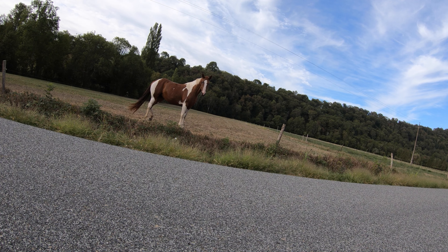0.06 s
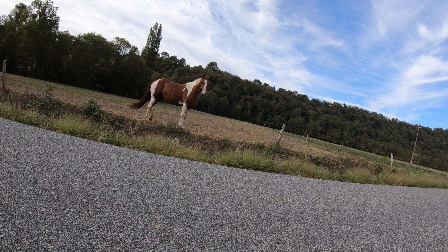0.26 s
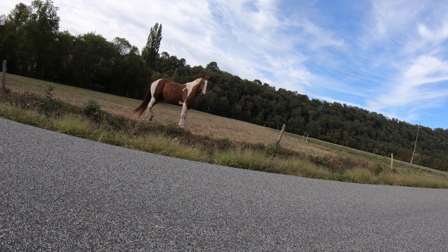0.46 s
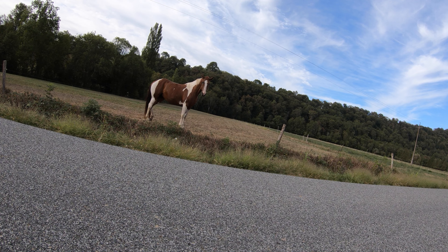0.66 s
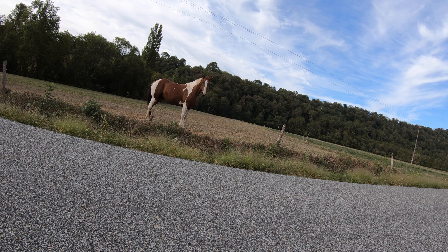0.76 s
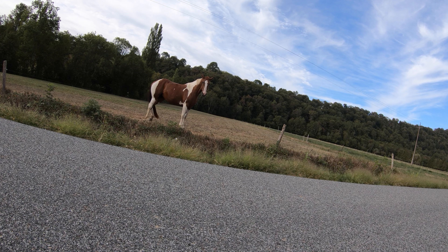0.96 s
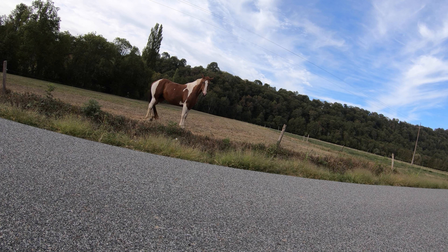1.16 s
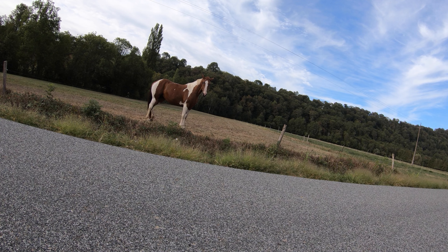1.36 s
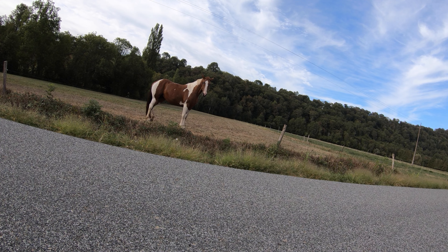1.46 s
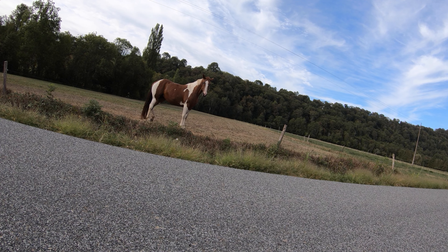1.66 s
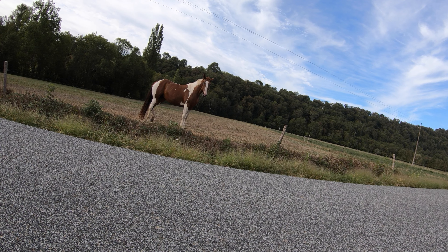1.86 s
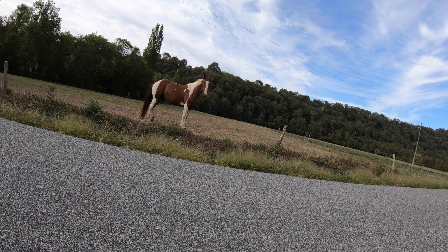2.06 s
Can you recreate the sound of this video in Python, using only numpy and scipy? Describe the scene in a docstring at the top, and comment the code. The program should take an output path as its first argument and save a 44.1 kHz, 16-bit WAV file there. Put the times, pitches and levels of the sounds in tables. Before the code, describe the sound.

A horse nickers softly, mostly on the right, over a faint outdoor hush. A throaty grunt at 0.3 s, with two tiny bird squeaks, then a hard double clack near 0.55 s with a faint bounce. Low fluttering grunts run 0.63-1.0 s. Dry grass rustles and stems crack around 1.2-1.4 s amid brighter grunts, which dull and fade by 1.75 s; a weak breathy murmur remains to about 2.1 s.

```python
"""A faint outdoor hush, then a horse nickers softly by a quiet country road, mostly on the right.
Grunts: slow breathy pulses ring airway resonances, bright at the start, dull at the end; a hoarse murmur
of weak pulses and breath links them. Dry grass hisses and rustles in a breeze (shaped noise) and its stalks
snap (noise bursts). Stems crack (decaying sines), something clacks twice with a faint bounce (sines and
noise), and a small bird squeaks twice (bent tones)."""
import sys
import numpy as np
from scipy import signal
from scipy.fft import rfft, irfft, next_fast_len
from scipy.io import wavfile
from scipy.ndimage import map_coordinates

SR = 44100
rng = np.random.default_rng(int(sys.argv[2]) if len(sys.argv) > 2 else 0)


def inscribe(sig):
    """Save sig as 16-bit PCM at rate SR to the path in sys.argv[1].

    A 1-D sig is mono; a 2-D sig holds one channel per row.
    Samples are clipped to [-1, 1] before scaling.
    """
    pcm = np.round(np.clip(np.atleast_2d(sig).T, -1, 1) * 32767)
    wavfile.write(sys.argv[1], SR, pcm.astype(np.int16))


N = 93580


def amp(db):
    """Decibels to gain."""
    return 10 ** (np.asarray(db) / 20)


def unit(x):
    """Scale to rms 1 over all channels."""
    return x / np.sqrt(np.mean(x ** 2) + 1e-20)


def along(points, hz):
    """Interpolate (f/Hz, value) points on a log frequency axis."""
    f, v = np.transpose(points)
    return np.interp(np.log(hz + 1), np.log(f + 1), v)


def clock():
    """Time of each sample, s."""
    return np.arange(N) / SR


def level(rows):
    """Gain per sample from (t/s, level/dB) rows."""
    return amp(np.interp(clock(), *np.transpose(rows)))


def wobble(knots_per_s):
    """Smooth random curve through normal-distributed knots."""
    knots = rng.standard_normal(int(N * knots_per_s / SR) + 4)
    return map_coordinates(knots, [clock() * knots_per_s])


def filtered(x, response):
    """Filter x by a complex response of frequency, zero-padded."""
    m = next_fast_len(N + SR // 2)
    return irfft(rfft(x, m) * response(np.fft.rfftfreq(m, 1 / SR)), m)[..., :N]


def noise(spectrum, channels=2):
    """Unrelated noises coloured by (f/Hz, level/dB) points, rms 1."""
    white = rng.standard_normal((channels, N))
    return unit(filtered(white, lambda f: amp(along(spectrum, f))))


def pan(db):
    """Left and right gains; positive db favours the left."""
    return amp(np.array([[db], [-db]]) / 2)


def echo(x, db, t60_s):
    """Weak scattered answer from the surroundings: convolution with decaying noise."""
    t = np.arange(SR // 2) / SR
    tail = rng.standard_normal((2, len(t))) * amp(-60 * t / t60_s)
    tail = tail / np.linalg.norm(tail[0])
    return amp(db) * signal.fftconvolve(x, tail, axes=1)[:, :N]


# left against right: (f/Hz, level/dB)
LEFT_LEVEL = [(60, -30), (115, -13), (190, -17), (380, -8.5), (700, -2), (1200, -1)]
# left phase lead: (f/Hz, phase/rad)
LEFT_PHASE = [(30, 0), (120, 1.3), (190, 1.8), (340, 3.1), (700, 3), (1200, 2.6), (2400, 1.7), (4000, .4)]


def from_right(x):
    """A source at the right: the left side gets a weaker, phase-shifted copy."""
    def left_response(f):
        return amp(along(LEFT_LEVEL, f)) * np.exp(1j * along(LEFT_PHASE, f))
    return np.array([filtered(x, left_response), x])


# hush colour: (f/Hz, relative density/dB per Hz)
HUSH_SPECTRUM = [(14, -11.5), (30, 7), (44, -9), (58, 1.5), (100, -21.5), (170, 1), (450, -24),
                 (800, -11.5), (1400, -20), (2500, -36), (5000, -34), (7500, -38), (11000, -43),
                 (15400, -47)]
# left-right likeness: (f/Hz, correlation)
HUSH_LIKENESS = [(30, 0.83), (150, -0.17), (400, -0.21), (1000, -0.98), (3000, 0.58), (10000, -0.069)]
HUSH_DB = -59


def hush():
    """Faint, wide valley background: mid and side noise mixed to a set likeness per frequency."""
    def mid_side_gains(f):
        angle = np.arccos(np.clip(along(HUSH_LIKENESS, f), -1, 1)) / 2
        return np.array([np.cos(angle), np.sin(angle)])
    mid, side = filtered(noise(HUSH_SPECTRUM), mid_side_gains)
    return amp(HUSH_DB) * unit(np.array([mid + side, mid - side])) * pan(0.45)


# stalks snapping: (t/s, level/dB, centre f/Hz, e-fold decay/s)
STALK_SNAPS = [(.413, -63, 6150, 0.0012), (0.643, -62.5, 7300, 0.0017), (0.786, -62, 7800, 0.0014),
               (.824, -54, 3000, 0.00084), (1.18, -51, 785, 0.0042), (1.231, -57, 2230, 0.012),
               (1.289, -55.5, 1980, 0.013), (1.346, -62, 1890, 0.008), (1.365, -61, 5670, 0.021),
               (1.375, -60, 7850, 0.0073)]
SNAP_OCTAVES = .55  # half-width of the snap band


def snaps():
    """Single stalks snap: decaying noise bursts, each in its own band."""
    t, out = clock(), np.zeros(N)
    for s, db, hz, decay_s in STALK_SNAPS:
        burst = rng.standard_normal(N) * (t >= s) * np.exp(-abs(t - s) / decay_s)
        burst *= np.sqrt(SR / (2 * hz * SNAP_OCTAVES))  # offset the band's power loss
        out += amp(db) * filtered(burst, lambda f: 1 / (1 + (np.log2((f + 1) / hz) / SNAP_OCTAVES) ** 4))
    return out


# hiss before HISS_GAIN_DB: (t/s, level/dB)
HISS_LEVEL = [(0.0, -81), (0.26, -78.5), (0.37, -71.5), (0.57, -71.5), (1.1, -65.5), (1.17, -61),
              (1.34, -63), (1.37, -54.5), (1.43, -66.5), (2.12, -75.5)]
# hiss colour: (f/Hz, relative density/dB per Hz)
HISS_SPECTRUM = [(1500, -37), (2500, -2), (4700, -7.5), (6400, -2), (7600, -1), (8800, -8.5), (12200, -17),
                 (14000, -18), (15500, -22)]
# coarser rustle: (t/s, level/dB)
RUSTLE_LEVEL = [(0, -104), (.22, -79.5), (.31, -67), (.4, -75), (.53, -83), (.57, -66.5), (.7, -71.5),
                (1.0, -72), (1.04, -61.5), (1.1, -72.5), (1.17, -62.5), (1.2, -62.5), (1.24, -54.5),
                (1.32, -65), (1.36, -54.5), (1.44, -67.5), (2.12, -74)]
# rustle colour: (f/Hz, relative density/dB per Hz)
RUSTLE_SPECTRUM = [(300, -27), (800, -1.5), (1400, 0), (2100, 2), (3200, -11.5), (5000, -29), (9000, -32.5)]
# extra tilt of all grass sound, left against right: (f/Hz, level/dB)
GRASS_TILT = [(800, -11.5), (2000, -0.5), (5000, -7), (8000, -7.5), (12000, 0)]
HISS_GAIN_DB, GRAIN_DB, GRAIN_KNOTS_PER_S = -2, 1, 370


def grass():
    """A grainy hiss and a coarser rustle swell with the breeze; single stalks snap."""
    hiss = amp(HISS_GAIN_DB) * level(HISS_LEVEL) * noise(HISS_SPECTRUM)
    rustle = level(RUSTLE_LEVEL) * from_right(noise(RUSTLE_SPECTRUM, channels=1)[0])
    grain = unit(amp(GRAIN_DB * wobble(GRAIN_KNOTS_PER_S)))
    out = (hiss + rustle) * grain + from_right(snaps())
    return filtered(out, lambda f: amp(np.outer([.5, -.5], along(GRASS_TILT, f))))


# stem cracks: (t/s, low ring level/dB, high ring level/dB)
STEM_CRACKS = [(1.181, -51, -40), (1.3415, -32, -56)]
# low and high ring: f/Hz; t60/s
STEM_RING_HZ = (900, 2030)
STEM_RING_T60_S = (.022, .018)


def stems():
    """Thicker dry stems crack with a brief two-note ring: decaying sines."""
    out = np.zeros(N)
    for s, *levels in STEM_CRACKS:
        age = np.maximum(clock() - s, 0)
        for db, hz, t60_s in zip(levels, STEM_RING_HZ, STEM_RING_T60_S):
            out += amp(db - 60 * age / t60_s) * np.sin(2 * np.pi * hz * age)
    return out


# knocks: (t/s, ring level/dB, crack level/dB)
KNOCKS = [(0.5453, -53.5, -45), (0.5555, -46.5, -62), (0.5929, -63, -51.5)]
# ring modes: (f/Hz, level on top of the ring/dB, t60/s)
KNOCK_MODES = [(1087, 6.5, 0.023), (1192, 3, 0.02), (1997, -6.5, 0.037), (2160, -9.5, .02)]
# crack colour: (f/Hz, relative density/dB per Hz)
CRACK_SPECTRUM = [(600, 8), (2100, 1.5), (2900, -19), (5000, -13), (6500, 2.5), (8000, -25), (14000, -42)]
RING_ATTACK_S, RING_TOP_HZ, CRACK_T60_S = 0.0007, 2400, 0.014
RING_TAIL_DB, RING_TAIL_T60_S = -8, 0.18


def clacks():
    """Hard double knock and faint bounce: a crack and a short hollow ring, scattered by the trees."""
    t, ring, crack = clock(), np.zeros(N), np.zeros(N)
    for s, ring_db, crack_db in KNOCKS:
        age = np.maximum(t - s, 0)
        attack = 1 - np.exp(-age / RING_ATTACK_S)
        for hz, db, t60_s in KNOCK_MODES:
            ring += attack * amp(ring_db + db - 60 * age / t60_s) * np.sin(2 * np.pi * hz * age)
        crack += (t >= s) * amp(crack_db - 60 * age / CRACK_T60_S)
    ring = filtered(ring, lambda f: 1 / np.sqrt(1 + (f / RING_TOP_HZ) ** 20)) * pan(4.1)
    return ring + echo(ring, RING_TAIL_DB, RING_TAIL_T60_S) + crack * noise(CRACK_SPECTRUM)


# bird: (t/s, level/dB)
BIRD_SQUEAKS = [(0.337, -68.5), (.362, -63.5)]
SQUEAK_HZ, SQUEAK_S, SQUEAK_BEND_HZ = 7700, 0.0067, 283  # lowest pitch, 1/e half-length, rise there


def bird():
    """Two thin squeaks: bell-shaped tones, each dipping and rising in pitch."""
    out = np.zeros(N)
    for s, db in BIRD_SQUEAKS:
        u = np.clip((clock() - s) / SQUEAK_S, -4, 4)
        cycles = np.cumsum(SQUEAK_HZ + SQUEAK_BEND_HZ * u * u) / SR
        out += amp(db) * np.exp(-u * u) * np.sin(2 * np.pi * cycles)
    return out


MUFFLE = 1.067  # soft-tissue cutoff as a multiple of the resonance frequency


def resonance(f, hz, width_hz):
    """Airway resonance with steep skirts; soft tissue muffles it above its centre."""
    def band(w):
        return 1j * f * w / (hz * hz - f * f + 1j * f * w)
    return band(width_hz) * band(6 * width_hz) / np.sqrt(1 + (f / (MUFFLE * hz)) ** 20)


# low hum, then throaty hum, before MURMUR_GAIN_DB: (t/s, level/dB)
HUM_LEVEL = [(0, -69.5), (0.041, -53.5), (.1, -72), (.29, -76), (0.379, -39), (.42, -51), (.5, -48),
             (.6, -45.5), (0.799, -54.5), (1.029, -45), (1.11, -56), (1.17, -53.5), (1.42, -53.5),
             (1.66, -59.5), (1.75, -58), (1.85, -50), (2.12, -57.5)]
THROAT_HUM_LEVEL = [(0, -57), (.06, -60.5), (0.149, -78), (.29, -79), (.38, -50.5), (.45, -56), (.52, -47),
                    (.6, -52.5), (.8, -59), (.97, -47.5), (1.05, -50), (1.11, -69), (1.42, -58),
                    (1.66, -60.5), (1.745, -61), (1.78, -58.5), (1.92, -51), (2.039, -49.5), (2.12, -80)]
# their resonances: (f/Hz, width/Hz, relative level/dB)
HUM_MODES = [(156.9, 4.7, 12.5), (200, 67, 2.5), (672, 22, -14), (835, 120, -21.5), (1250, 1300, -30.5)]
THROAT_HUM_MODES = [(324, 36, -4.5), (394, 29, 0)]
MURMUR_GAIN_DB, MURMUR_RATE_HZ = 2.5, 65.7
MURMUR_WANDER, MURMUR_BREATH = .05, 2.4  # rate drift (share), breath rms against pulse rms
FLUTTER_KNOTS_PER_S, FLUTTER_DB = 45.31, 2


def murmur():
    """Weak pulses and fluttering breath keep the airway humming between the grunts."""
    rate_hz = MURMUR_RATE_HZ * (1 + MURMUR_WANDER * wobble(20))
    cycles = np.floor(np.cumsum(rate_hz) / SR)
    pulses = unit(np.diff(cycles, prepend=0))  # one click per new cycle
    flutter = amp(FLUTTER_DB * wobble(FLUTTER_KNOTS_PER_S))
    source = (pulses + MURMUR_BREATH * rng.standard_normal(N)) * flutter
    out = np.zeros(N)
    for modes, curve in [(HUM_MODES, HUM_LEVEL), (THROAT_HUM_MODES, THROAT_HUM_LEVEL)]:
        hum = filtered(source, lambda f: sum(amp(db) * resonance(f, hz, w) for hz, w, db in modes))
        out += level(curve) * unit(hum)
    return amp(MURMUR_GAIN_DB) * out


GLIDE_LENGTHS = 1.61  # pitch fall, in grunt lengths


def sinking(x, glide):
    """Time warp: each grunt starts sharp and ends flat by the share glide as the airway relaxes."""
    t, ahead = clock(), np.zeros(N)
    for start, length_s, *_ in GRUNT_EVENTS:
        span = GLIDE_LENGTHS * length_s
        u = np.clip((t - start) / span, 0, 1)
        ahead += glide * span * u * (1 - u)
    return np.interp(t + ahead, t, x)


# grunts: (t/s, length/s, pulse rate before sag and glide/Hz, belly, chest, throat, nose, rasp drive/dB)
GRUNT_EVENTS = [(.312, 0.023, 66.4, -33, -31, -35, -46, -51),
                (.632, 0.038, 61.87, -31.5, -44, -45, -57.5, -62),
                (0.72, 0.02, 60.9, -37.5, -31, -37.5, -72, -75),
                (0.747, 0.018, 62.1, -32, -31.5, -40, -78, -76),
                (0.779, 0.016, 60.2, -40, -42, -49.5, -72, -78),
                (0.836, 0.032, 66.55, -21.5, -28.5, -40.5, -58, -76),
                (0.898, 0.03, 68, -26, -42, -38, -80, -66), (0.957, 0.03, 65.5, -46, -42, -39, -64, -78),
                (1.236, 0.037, 63.78, -26.5, -28.5, -31, -47, -45),
                (1.299, 0.022, 60.4, -28, -39.5, -46, -54, -71),
                (1.450, 0.035, 62.04, -33.5, -25, -34.5, -44, -44),
                (1.519, 0.03, 61.4, -28.5, -32, -55.5, -55, -66),
                (1.59, 0.016, 53.2, -29, -44.5, -55, -63, -72),
                (1.692, 0.017, 58.6, -57, -42, -61, -65, -65),
                (1.729, 0.0074, 56.7, -49, -39.5, -62, -71, -70)]
# airway resonances before glide:
# (f/Hz, width/Hz, relative level/dB, swell/grunt lengths, hold/grunt lengths, e-fold release/s)
BELLY_MODES = [(140, 37, -4.5, 0.76, 0.58, 0.008)]
CHEST_MODES = [(203, 36, -2.5, 0.12, 1.0, 0.012)]
THROAT_MODES = [(320, 32, -2.5, .12, .5, .012), (397, 25, 2.5, .14, .5, .016)]
NOSE_MODES = [(519, 67, 0.69, 0.13, 0.27, 0.025), (677, 96, 3.4, 0.18, 0.78, 0.0045)]
RASP_MODES = [(1206, 190, -2.4, 0.093, 0.16, 0.01)]
# glide of belly, chest, throat, nose, rasp (share)
GROUP_GLIDES = [.2, .14, .03, .02, .02]
SAG_PER_S, JITTER, SHIMMER_DB = .8, .025, 1.5  # pulse-rate fall, gap scatter (share), size scatter
BREATH, FIRST_PULSE_S, PULSES = .28, 0.001933, 12


def grunts():
    """Slow, breathy pulses ring the airway; the high resonances speak first and fade first."""
    t, out = clock(), np.zeros(N)
    groups = [BELLY_MODES, CHEST_MODES, THROAT_MODES, NOSE_MODES, RASP_MODES]
    drives = [np.zeros((len(group), N)) for group in groups]
    for start, length_s, rate_hz, *levels in GRUNT_EVENTS:
        age = np.maximum(t - start, 0)
        jitter, shimmer = rng.standard_normal((2, PULSES))
        gaps = (1 + JITTER * jitter) / rate_hz * np.exp(SAG_PER_S * np.arange(PULSES) / rate_hz)
        times = start + FIRST_PULSE_S + np.cumsum(gaps) - gaps[0]
        pulses = np.bincount((times * SR).astype(int), amp(SHIMMER_DB * shimmer), N)[:N]
        source = pulses * np.sqrt(SR / rate_hz) + BREATH * rng.standard_normal(N)
        for group, drive, db in zip(groups, drives, levels):
            for k, (hz, width_hz, gain_db, swell, hold, release_s) in enumerate(group):
                rise = np.sqrt(np.minimum(age / (swell * length_s), 1))
                fall = np.exp(-np.maximum(age - (swell + hold) * length_s, 0) / release_s)
                drive[k] += amp(db + gain_db) * rise * fall * source
    for group, drive, glide in zip(groups, drives, GROUP_GLIDES):
        for (hz, width_hz, *_), push in zip(group, drive):
            ring = filtered(push, lambda f: resonance(f, hz, width_hz))
            ring *= np.sqrt(SR / (np.pi * width_hz))  # offset the band's power loss
            out += sinking(ring, glide)
    return out


ECHO_DB, ECHO_T60_S = -13.5, 0.18


def scene():
    """Hush, grass, knocks, stems, bird and horse in the open air."""
    near = from_right(grunts() + murmur() + stems()) + bird()
    return hush() + grass() + clacks() + near + echo(near, ECHO_DB, ECHO_T60_S)


ROLL_OFF_HZ, TOP_HZ = 14000, 15600


def record(dry):
    """Roll off the highest treble and keep nothing from the band limit up."""
    return filtered(dry, lambda f: (f < TOP_HZ) / np.sqrt(1 + (f / ROLL_OFF_HZ) ** 20))


dry = scene()
out = record(dry)
inscribe(out)
```